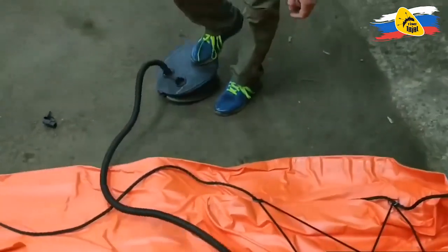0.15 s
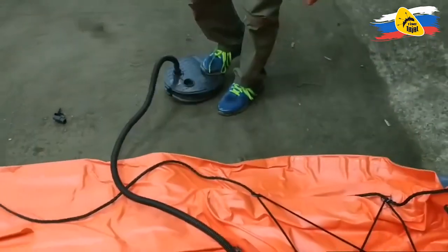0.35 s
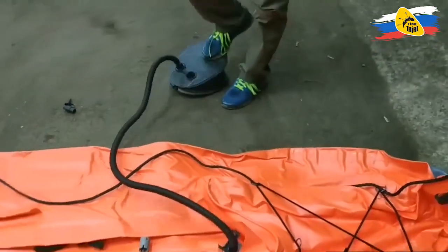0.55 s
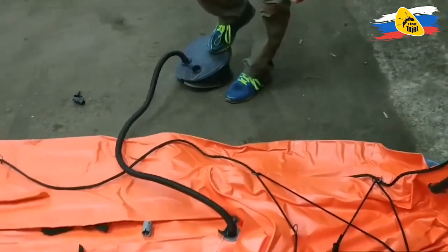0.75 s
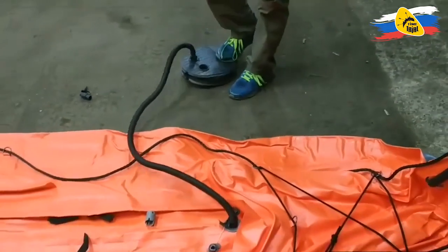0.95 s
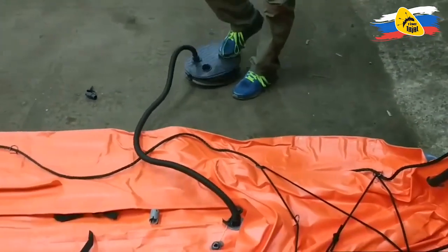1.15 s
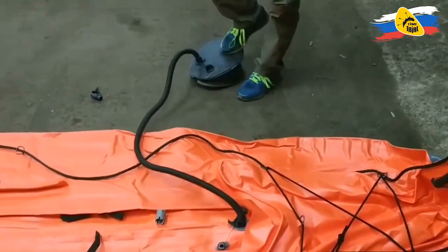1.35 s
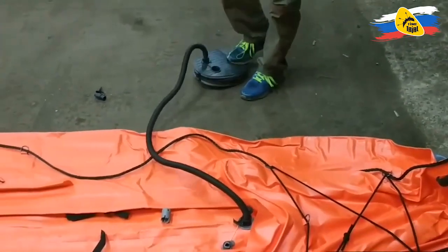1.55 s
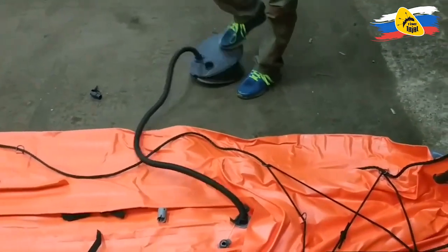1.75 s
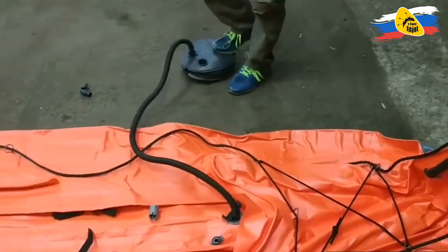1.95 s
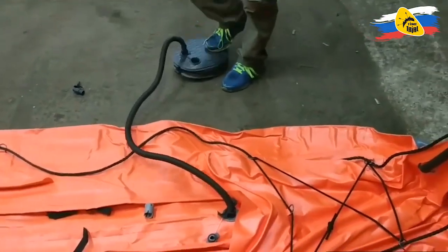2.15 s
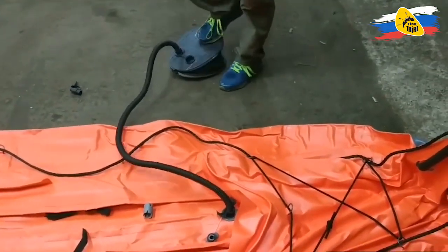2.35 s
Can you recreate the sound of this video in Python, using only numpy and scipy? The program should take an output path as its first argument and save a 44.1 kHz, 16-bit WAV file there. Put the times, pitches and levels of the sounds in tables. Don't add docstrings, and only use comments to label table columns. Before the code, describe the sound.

Four steady strokes of a foot air pump: rushing hiss with thin fluttering whistling tones, then hollow low thuds, rattling knocks and small clicks as it refills, heard fairly close in stereo in a reverberant concrete room.

```python
import sys
import numpy as np
from scipy import signal
from scipy.fft import rfft, irfft
from scipy.io import wavfile
from scipy.ndimage import uniform_filter1d, map_coordinates

SR = 44100
rng = np.random.default_rng(int(sys.argv[2]) if len(sys.argv) > 2 else 0)


def volts(x):
    e = np.asarray(x, float) / 20
    return 10 ** e


def generate_wav(signal):
    frames = np.transpose(np.atleast_2d(signal))
    scaled = np.clip(frames, -1, 1) * 32767
    pcm = np.round(scaled).astype(np.int16)
    wavfile.write(sys.argv[1], SR, pcm)


N = 110250
TIME = np.arange(N) / SR


def evened(x):
    return x / np.sqrt(np.mean(x ** 2) + 1e-20)


def add(mix, start, sound):
    part = mix[max(round(start * SR), 0):][:len(sound)]
    part += sound[:len(part)]


def coloured(points, size):
    f, db = np.transpose(points)
    hz = np.fft.rfftfreq(N, 1 / SR)
    gain = volts(np.interp(np.log(hz + 1), np.log(f + 1), db))
    return evened(irfft(rfft(rng.standard_normal((size, N))) * gain, N))


def slow(n, rate_hz):
    w = max(int(SR / rate_hz / 2), 2)
    smooth = uniform_filter1d(uniform_filter1d(rng.standard_normal(n + 2 * w), w), w)
    return evened(smooth[w:w + n])


def ring(hz, t60, rise_s):
    t = np.arange(0, t60, 1 / SR)
    return np.sin(2 * np.pi * hz * t) * np.minimum(t / rise_s, 1) * volts(-60 * t / t60)


def hiss():
    # (start [s], rise [s], hold [s], level [dB])
    pushes = [
        (0.194, 0.17, 0.17, -27),
        (0.907, 0.094, 0.16, -27),
        (1.485, 0.071, 0.16, -26),
        (1.984, 0.093, 0.13, -26.5),
    ]
    # (frequency [Hz], level [dB per Hz])
    jet_colour = [(500, -10.5), (1000, -11.5), (2400, 4), (3900, -4), (4600, -11.5), (7500, 2.5),
                  (9000, -1.5), (15000, -0.5)]
    sag_db, release_s = -6.5, 0.079
    spacing_hz, echo, near_db = 111.7, 0.39, 10.5
    same = 0.53
    flow = np.zeros(N)
    for start, rise, hold, db in pushes:
        corners = start + np.cumsum([0, rise, hold, release_s])
        level = np.interp(TIME, corners, [db - 25, db, db + sag_db, db - 21])
        flow += volts(level) * (TIME > start) * (TIME < start + rise + hold + release_s)
    jet = coloured(jet_colour, size=3) * flow * volts(slow(N, 26))
    trip = np.zeros(round(SR / spacing_hz) + 1)
    trip[0], trip[-1] = 1, -echo
    near = jet[0] + volts(near_db) * signal.lfilter([1], trip, jet[0])
    return same * near, np.sqrt(1 - same ** 2) * jet[1:]


def mode(hz, db, length, wander_db, lag):
    lock_s, drift_hz, song_db = .012, 5, -.5
    flutter_db, sway_db, sway_rad = 2.2, 2.5, .25
    t = np.arange(0, length + 2 * lock_s, 1 / SR)
    edge = np.clip(np.minimum(t, t[-1] - t) / (2 * lock_s), 0, 1)
    turns = np.cumsum(hz + drift_hz * slow(len(t), 44)) / SR + rng.random()
    level = np.linspace(*db, len(t)) + wander_db * slow(len(t), 18) + flutter_db * slow(len(t), 84)
    sway = sway_db * slow(len(t), 10.7)
    half = lag / 2 + sway_rad * slow(len(t), 13.1)
    left = volts(sway) * np.cos(2 * np.pi * turns - half)
    right = volts(-sway) * np.cos(2 * np.pi * turns + half)
    loudness = np.sqrt(2) * volts(level + song_db) * np.sin(edge * np.pi / 2) ** 2
    return (loudness * np.array([left, right])).T


def whistle():
    # (start [s], frequency [Hz], level [dB], length [s])
    songs = [(.3, 2230, -32, .035), (.385, 2230, -33, .04), (.33, 2340, -37, .09), (.335, 2452, -32, .06),
             (.35, 2558, -33, .06), (.36, 2770, -39, .06), (.45, 2452, -38, .1), (.415, 2988, -28, .06),
             (.48, 2988, -33, .12), (.43, 3098, -30, .035), (.465, 3098, -21, .07), (.44, 3216, -33, .2),
             (.44, 3336, -32, .08), (.44, 3455, -33, .09), (.56, 2290, -35, .035), (1.025, 3458, -22, .06),
             (1.025, 3578, -27, .03), (1.055, 3578, -19.5, .065), (1.145, 3578, -24, .105),
             (1.02, 3688, -31, .035), (1.02, 3795, -37, .1), (1.055, 3688, -21, .07),
             (1.13, 3688, -15.5, .08), (1.13, 3795, -29, .15), (1.02, 3910, -33, .11),
             (1.19, 3910, -32, .07), (1.03, 4030, -32, .045), (1.07, 4030, -40, .14),
             (1.586, 3465, -23, .05), (1.57, 3357, -33, .055), (1.59, 3815, -30, .1),
             (1.69, 3805, -35, .15), (1.6, 3691, -19, .05), (1.655, 3691, -13.5, .095),
             (1.742, 2410, -32, .06), (1.81, 3697, -20, .08), (2.095, 3345, -28, .05),
             (2.17, 3578, -23, .105), (2.285, 3454, -20, .028), (2.3, 3793, -26, .09),
             (2.33, 3454, -28, .065), (2.19, 3686, -23.5, .085), (2.105, 4024, -25, .06),
             (2.125, 3793, -22, .16), (2.135, 3686, -23, .055), (2.115, 3454, -27, .08),
             (2.2, 3454, -24, .085)]
    # (start [s], frequency [Hz], level [dB], length [s])
    overtones = [(1.015, 7040, -33, .05), (1.035, 7262, -23, .075), (1.06, 7375, -22.5, .075),
                 (1.09, 7470, -29, .08), (1.14, 7375, -33, .12), (1.59, 7165, -31, .04),
                 (1.61, 7385, -18.5, .095), (1.71, 7385, -33, .12), (1.6, 7500, -33, .11),
                 (1.6, 7616, -31, .05), (2.115, 7150, -34, .09), (2.115, 7270, -31, .04),
                 (2.14, 7380, -28, .055), (2.135, 7480, -30, .09), (2.14, 7590, -33, .05)]
    # (start [s], frequency [Hz], level [dB], fall [dB per s])
    lingers = [(.55, 3098, -26, 55), (.8, 3098, -39, 25), (1.085, 3456, -29, 30), (1.26, 3580, -28, 90),
               (1.215, 3686, -20, 42), (1.9, 3695, -27, 80), (2.285, 3686, -29, 50), (2.4, 3455, -34, 50),
               (2.17, 4026, -29, 35), (2.31, 3576, -30, 60), (2.15, 3340, -31, 55)]
    lock_s, wander_db, linger_wander_db = .012, 1.0, 2.5
    song_lag, overtone_lag = 1.5, 2.0
    fade_db, linger_s = 12, .3
    out = np.zeros((N, 2))
    for start, hz, db, length in songs:
        add(out, start - lock_s, mode(hz, (db, db), length, wander_db, song_lag))
    for start, hz, db, length in overtones:
        add(out, start - lock_s, mode(hz, (db, db), length, wander_db, overtone_lag))
    for start, hz, db, fall in lingers:
        length = min(fade_db / fall, linger_s)
        add(out, start - lock_s, mode(hz, (db, db - fall * length), length, linger_wander_db, song_lag))
    return out.T


def thuds():
    # (time [s], peak level [dB], frequency [Hz])
    wall_thuds = [(0.146, -11, 235), (0.225, -20, 305), (0.249, -18.5, 240), (0.311, -22.5, 243),
                  (0.364, -33, 241), (0.623, -24.5, 286), (0.689, -14.5, 256), (0.768, -13, 263.5),
                  (0.871, -19.5, 272), (0.916, -20, 291), (1.284, -28, 242), (1.349, -25, 256),
                  (1.401, -13, 278), (1.43, -24, 313), (1.481, -20, 298.5), (1.525, -26.5, 252),
                  (1.851, -20, 286), (1.904, -15.5, 262.4), (1.944, -19.5, 306), (1.99, -14, 282),
                  (2.019, -15.5, 300), (2.039, -17.5, 234.5), (2.07, -20.5, 344), (2.347, -19, 297),
                  (2.389, -21.5, 286), (2.44, -24, 346)]
    t60, rise_s, upper_ratio, upper_db = 0.1, 0.0024, 1.45, -9
    out = np.zeros(N)
    for start, db, hz in wall_thuds:
        low = ring(hz, t60, rise_s)
        upper = ring(hz * upper_ratio, t60, rise_s)
        add(out, start, volts(db) * (low + volts(upper_db) * upper))
    return out


def knock(hz):
    t60, width = .07, 0.52
    t = np.arange(0, t60, 1 / SR)
    sos = signal.butter(2, [hz * (1 - width), hz * (1 + width)], "band", fs=SR, output="sos")
    rattle = evened(signal.sosfilt(sos, rng.standard_normal(3 * len(t)))[-len(t):])
    return rattle * np.minimum(t / 0.0017, 1) * volts(-60 * t / t60)


def knocks():
    # (time [s], peak level [dB], frequency [Hz])
    board_knocks = [(0.013, -29.5, 1200), (0.145, -29.5, 825), (0.311, -24, 830), (0.44, -26.5, 730),
                    (0.671, -27.5, 710), (0.763, -23.5, 634), (0.905, -36, 1040), (0.954, -21, 657),
                    (1.071, -20.5, 755), (1.349, -28, 820), (1.402, -26.5, 630), (1.494, -25, 477),
                    (1.523, -23, 614), (1.848, -27.5, 676), (1.906, -23, 557), (2.041, -21.5, 529),
                    (2.38, -26.5, 529)]
    out = np.zeros(N)
    for start, db, hz in board_knocks:
        add(out, start, volts(db + 1) * knock(hz))
    return out


def ticks():
    # (time [s], peak level [dB], frequency [Hz], snap level [dB])
    sharp_ticks = [(0.011, -23, 1880, -9.5), (.019, -27, 2420, -8.5), (0.1457, -21, 1520, -25),
                   (0.1524, -21, 2150, 1), (0.2256, -17.5, 1550, -12.5), (0.6562, -15, 2960, 2),
                   (0.9092, -20.5, 1020, -30), (.954, -32, 1700, -24), (0.976, -13.5, 680, -17),
                   (1.463, -51, 5470, -8)]
    t60 = 0.013
    out = np.zeros(N)
    for start, db, hz, snap_db in sharp_ticks:
        tone = ring(hz, t60, 0.00022) + .5 * ring(1.54 * hz, t60, 0.0014)
        snap = rng.standard_normal(len(tone)) * volts(-np.linspace(0, 60, len(tone)))
        add(out, start, volts(db) * (tone + volts(snap_db) * snap))
    return out


def flexing():
    # (time [s], level [dB])
    flex_levels = [(0, -38), (.04, -47.5), (.14, -57), (.16, -46.5), (.32, -32.5), (.6, -40.5),
                   (.69, -31.5), (.98, -38.5), (1.251, -38.5), (1.311, -29.5), (1.54, -35.5), (1.62, -43),
                   (1.81, -41), (1.849, -25.5), (2.08, -40), (2.15, -40), (2.3, -44.5), (2.349, -28),
                   (2.5, -38)]
    # (frequency [Hz], width [Hz], level [dB])
    body_modes = [(194, 15, -43), (288, 58, 1), (393.5, 73, -1), (574, 220, -6.5), (696, 190, -6.5),
                  (900, 210, -9.5), (1700, 1800, -15.5), (2560, 160, -22)]
    # (frequency [Hz], level [dB per Hz])
    suck_colour = [(700, 8.5), (2000, 5.5), (6500, -5), (15000, -9)]
    slips_per_s, slip_db, flex_db, suck_db = 1600, 2.5, 1.5, -4.5
    happens = rng.random((2, N)) < slips_per_s / SR
    strength = volts(slip_db * np.minimum(rng.exponential(1, (2, N)), 2))
    slips = rng.standard_normal((2, N)) * happens * strength
    slips[1] = 1.02 * slips[0] + 0.47 * slips[1]
    body = np.zeros(SR // 4)
    for hz, width, db in body_modes:
        add(body, 0, volts(db) * width * ring(hz, min(2.64 / width, .25), 0.00026))
    creak = evened(signal.fftconvolve(slips, body[None], axes=1)[:, :N])
    suck = volts(suck_db) * coloured(suck_colour, size=2)
    return volts(flex_db + np.interp(TIME, *np.transpose(flex_levels))) * (creak + suck)


def ports(x, lag, left_db):
    late = map_coordinates(x, [np.arange(N) - lag], order=5, mode="nearest")
    return np.array([late * volts(left_db), x * volts(-left_db)])


def hall(x):
    # (frequency [Hz], time to fall 60 dB [s])
    hall_decay = [(250, 0.23), (1500, 1.64), (6000, 1.09), (15000, 0.6)]
    hz, t, z = signal.stft(rng.standard_normal((2, SR)), SR, nperseg=256)
    f, t60 = np.transpose(hall_decay)
    band_t60 = np.interp(np.log(hz + 1), np.log(f), t60)[:, None]
    z = z * volts(-60 * t / band_t60) * (t > .012)
    tail = signal.istft(z, SR, nperseg=256)[1]
    return signal.fftconvolve(x[None], tail / np.linalg.norm(tail[0]), axes=1)[:, :N]


def still_air():
    # (frequency [Hz], level [dB per Hz])
    air_colour = [(30, -28), (138, -24), (300, -3), (1070, -13), (3600, -24), (7000, -31), (16000, -36)]
    air = coloured(air_colour, size=3)
    return volts(-43) * (0.29 * air[0] + .5 * air[1:])


def handling():
    # (frequency [Hz], level [dB per Hz])
    hand_colour = [(20, -12), (70, 9), (120, -14), (300, -48)]
    level = -71 + 3.9 * slow(N, 7.3) + np.interp(TIME, [1.9, 2.0], [0, -9])
    return volts(level) * coloured(hand_colour, size=1)


def scene():
    # (time [s], lag [samples])
    valve_lag = [(0, 6.9), (.3, 10.4), (.45, 10.4), (.56, 9.4), (.95, 8.46), (1.15, 8), (1.5, 8.26),
                 (1.65, 7), (2.0, 9.7), (2.5, 9.0)]
    jet, spread = hiss()
    song = whistle()
    blows = thuds() + knocks() + ticks()
    rumble = flexing()
    turn = np.interp(TIME, *np.transpose(valve_lag))
    near = ports(jet, turn, 2) + song + ports(blows, 1.3, -0.3) + spread + rumble
    song_hall_db, hall_db = -12, -4
    wet = hall(jet + volts(song_hall_db) * song[0] + blows + rumble[0])
    return near + volts(hall_db) * wet


def low_pass(x):
    return signal.sosfilt(signal.butter(12, 16660, fs=SR, output="sos"), x)


def record(dry):
    bass_cut_hz, ceiling, edge_hz = 165, .85, 15560
    soft = ceiling * np.tanh(dry / ceiling)
    x = signal.sosfilt(signal.butter(5, bass_cut_hz, "high", fs=SR, output="sos"), soft)
    x = x + still_air() + handling()
    top_cut = signal.firwin(255, edge_hz, window=("kaiser", 9), fs=SR)
    return low_pass(signal.oaconvolve(x, top_cut[None], "same"))


dry = scene()
out = record(dry)
generate_wav(out)
```